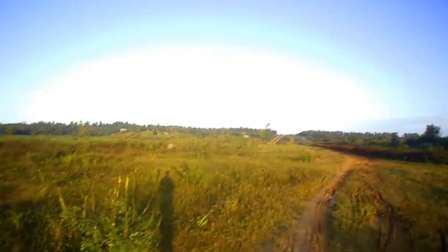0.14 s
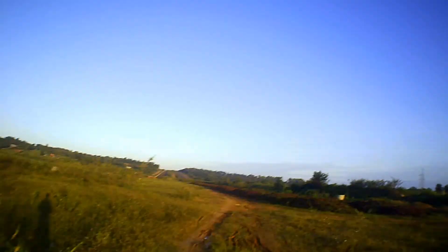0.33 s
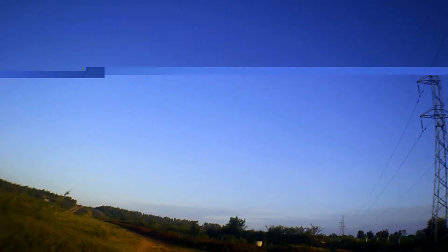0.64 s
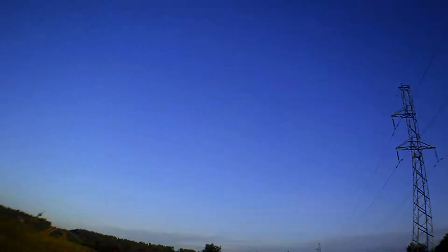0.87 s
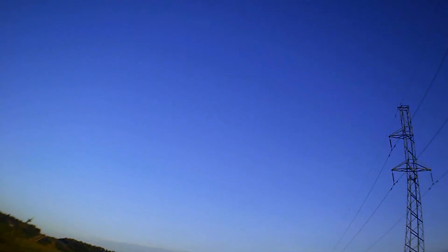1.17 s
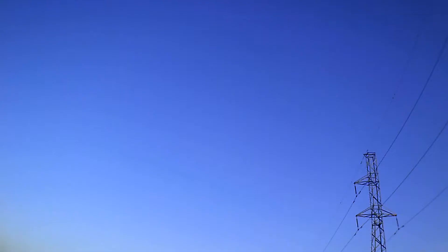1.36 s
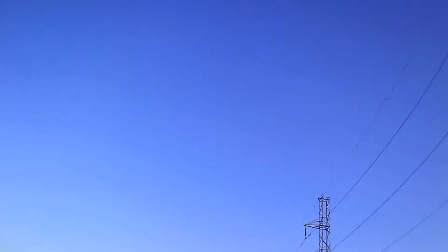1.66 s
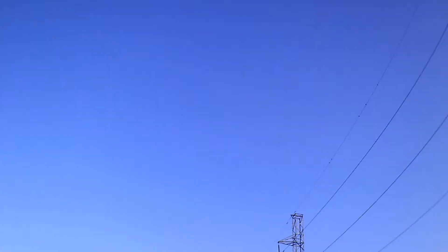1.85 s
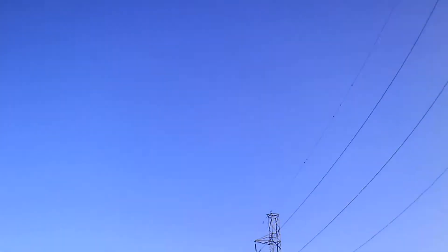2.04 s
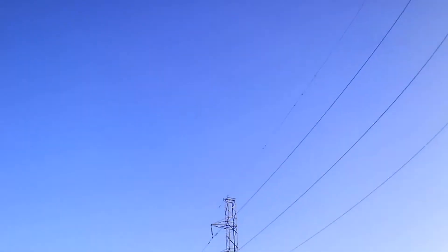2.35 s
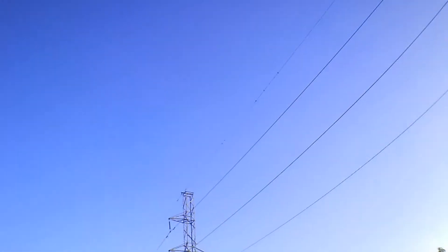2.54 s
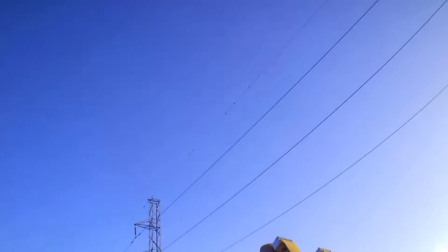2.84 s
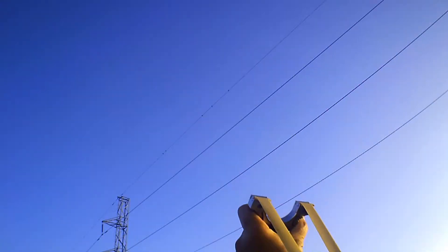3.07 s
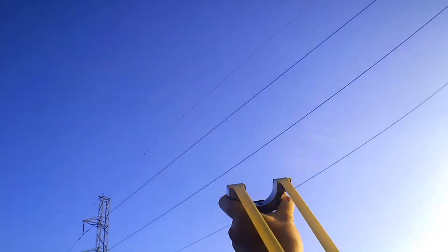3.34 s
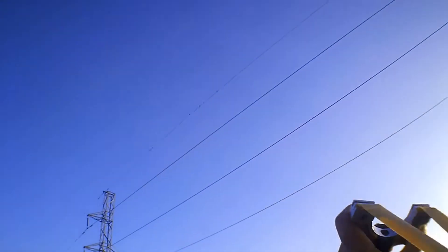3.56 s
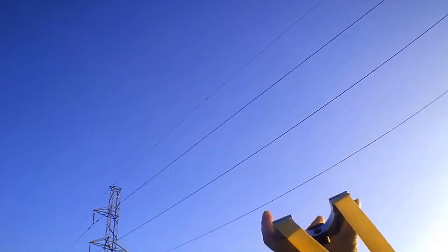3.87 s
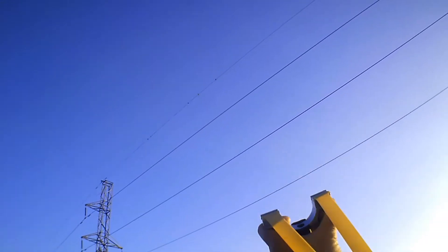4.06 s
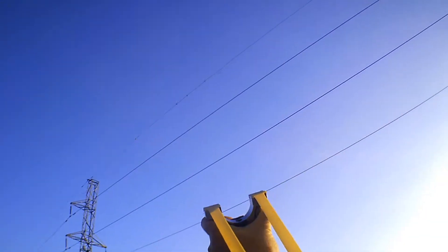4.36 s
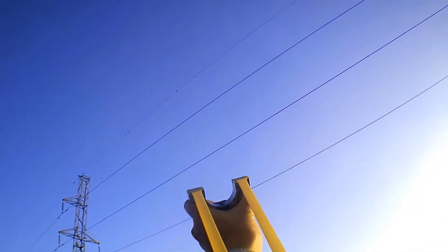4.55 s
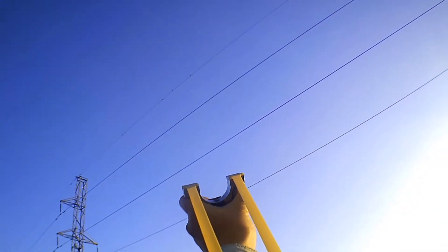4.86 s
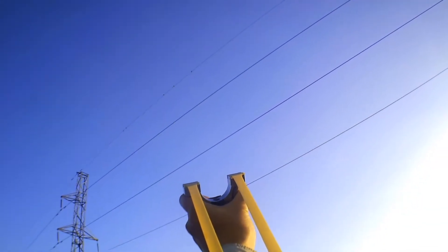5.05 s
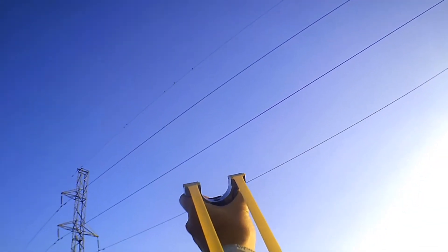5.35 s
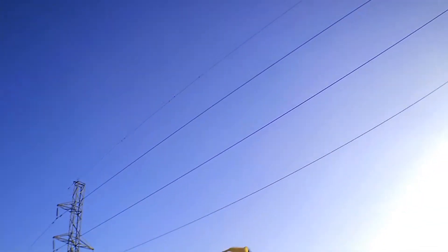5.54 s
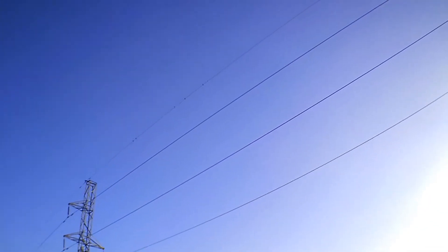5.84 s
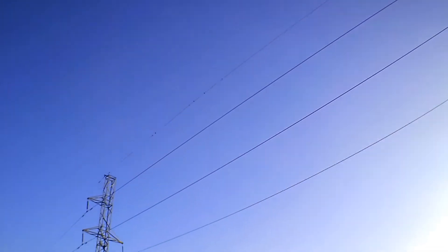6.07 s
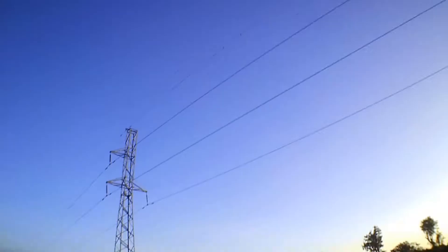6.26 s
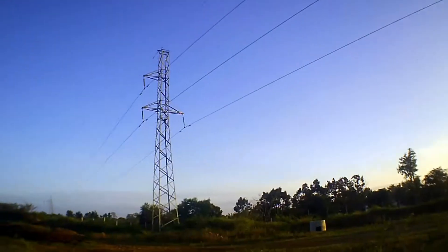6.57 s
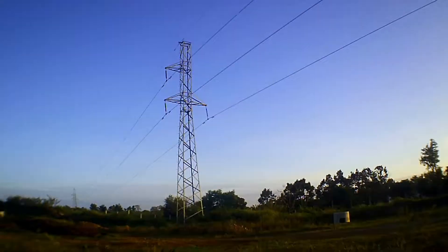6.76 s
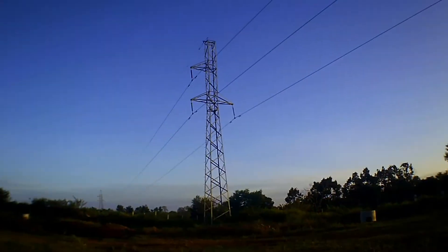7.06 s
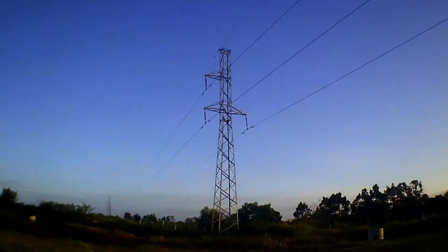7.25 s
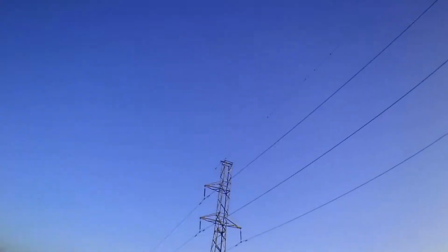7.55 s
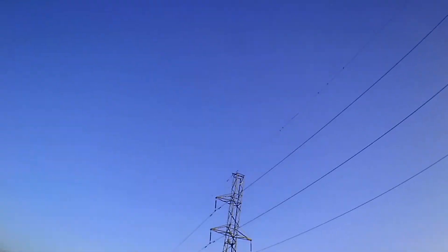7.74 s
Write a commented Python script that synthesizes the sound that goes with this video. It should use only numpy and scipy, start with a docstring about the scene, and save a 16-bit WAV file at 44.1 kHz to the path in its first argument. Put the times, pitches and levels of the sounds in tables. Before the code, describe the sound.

In a quiet open field, low wind buffets a small close microphone while far birds whistle and chirp faintly. Just after two seconds a slingshot fires with one loud, dry crack, a short thump of air and rapid rubber slaps, leaving a thin scattered echo. Later a hand rubs and creaks on the stretched rubber, with small knocking squeaks, as wind gusts and birds continue.

```python
"""A slingshot is shot once in an open field: damped modes for the shoved air and the recoiling hand, a swept
crack as the bands whip past the fork, then noise bursts for the flapping and struck modes for the slaps. Later
the hand rubs and creaks on the drawn slingshot, close to a small camera: random slips and short rings. Low-
passed noise buffets the microphone as wind; pitch-swept tones and resonant rasps are far birds and insects.
Grass rustles, a faint drone wavers, and bushes and banks throw the sounds back as scattered echoes."""
import sys
import numpy as np
from scipy import signal
from scipy.fft import rfft, irfft
from scipy.io import wavfile
from scipy.ndimage import uniform_filter1d

SR = 44100
rng = np.random.default_rng(int(sys.argv[2]) if len(sys.argv) > 2 else 0)


def wav_record(signal):
    """Record a signal, one row per channel, as 16-bit PCM in the file named by sys.argv[1]."""
    frames = np.transpose(np.atleast_2d(signal))
    bounded = np.clip(frames, -1, 1)
    # unit amplitude maps onto the largest positive 16-bit level
    quanta = np.round(bounded * 32767).astype(np.int16)
    wavfile.write(sys.argv[1], SR, quanta)


N = 348831
TIME = np.arange(N) / SR  # [s]
TOP_HZ = 15700  # upper band edge of the camera, and end of the crack's sweep

# air shoved by the bands, then the hand swaying as it recoils, as damped modes: (time [s], frequency [Hz], T60
# [s], level [dB])
SHOVE_MODES = [(2.3696, 152.5, 0.036, -18.5), (2.3736, 72.4, 0.031, -10.5), (2.4076, 22.57, .15, -22.5)]
# whip crack of the band tips, one row: (time [s], level [dB], length [s])
WHIP_CRACK = (2.3803, -18, 0.0022)


def undb(db):
    """Amplitude ratio from the logarithmic decibel scale."""
    return 10 ** (np.asarray(db) / 20)


def unit(x):
    """Normalise the mean power to 1."""
    return x / np.sqrt(np.mean(x ** 2))


def noise():
    """White noise: equal power at every frequency."""
    return rng.standard_normal(N)


def curve(rows):
    """Gain over time, interpolated linearly in level through (time [s], level [dB]) rows."""
    return undb(np.interp(TIME, *np.transpose(rows)))


def clock(length):
    """Sample times of a short sound [s]."""
    return np.arange(int(length * SR)) / SR


def add(out, start, sound):
    """Superpose a sound at its start time [s]."""
    i = max(int(start * SR), 0)
    out[i:i + len(sound)] += sound[:max(N - i, 0)]


def colour(x, points, size=16384):
    """Minimum-phase filter of unit energy, shaped by (frequency [Hz], relative level [dB]) points."""
    hz, db = np.transpose(points)
    bin_hz = np.arange(size // 2 + 1) * SR / size
    log_gain = np.log(undb(np.interp(np.log(bin_hz + 1), np.log(hz), db)))
    # folding the cepstrum onto positive times makes the response causal
    cepstrum = irfft(log_gain)[:size // 2]
    cepstrum[1:] *= 2
    response = irfft(np.exp(rfft(cepstrum, size)))
    return signal.fftconvolve(x, response / np.linalg.norm(response))[:N]


def walk(rate):
    """Random modulation of rms 1: random steps at this rate [Hz], smoothed by a moving average."""
    k = int(SR / rate)
    steps = np.repeat(rng.standard_normal(N // k + 1), k)
    return unit(uniform_filter1d(steps, k)[:N])


def ring(hz, t60):
    """Damped oscillation of one struck mode, falling 60 dB in t60 [s]."""
    t = clock(.5)
    return np.sin(2 * np.pi * hz * t) * np.exp(-np.log(1000) * t / t60)


def tone(hz):
    """Sine of rms 1 whose phase integrates a pitch track [Hz]."""
    return np.sqrt(2) * np.sin(2 * np.pi * np.cumsum(hz) / SR)


def swell(t, edge=0.19):
    """Amplitude envelope with cosine flanks that take this share of the note."""
    return signal.windows.tukey(len(t), edge)


def swells(rows, rise_s, fall_s):
    """Power sum of (start [s], length [s], level [dB]) events with Gaussian rise and exponential decay."""
    power = np.zeros(N)
    for start, length, db in rows:
        early = (start - TIME).clip(0)
        late = (TIME - start - length).clip(0)
        fade = (early / rise_s) ** 2 / 2 + late / fall_s
        power += (undb(db) * np.exp(-fade.clip(0, 20))) ** 2
    return np.sqrt(power)


def narrow(x, hz, width_hz):
    """Resonance of a second-order system, normalised to rms 1."""
    return unit(signal.lfilter(*signal.iirpeak(hz, hz / width_hz, SR), x))


def wind(rumble_db=2.0, eddy_db=2.0):
    """Turbulent pressure: breeze, gusts and the shot's draught rumble on the microphone, above a quiet hiss."""
    # breeze between gusts, before eddies and rumble gain: (time [s], level [dB])
    breeze_levels = [(0, -55.5), (.55, -54), (.85, -45), (1.75, -45.5), (2.15, -50), (2.9, -52),
                     (4.2, -48.5), (5.4, -50.5), (6.4, -45), (7.2, -46), (7.9, -49)]
    # gusts, before the rumble gain: (start [s], length [s], level [dB])
    gust_rows = [(.87, 0.24, -43.5), (3.05, 0.09, -44.5), (3.63, .12, -36), (3.76, 0.24, -32.5),
                 (4.06, .1, -43.5), (5.985, 0.027, -38.5), (6.44, .07, -35.5), (6.8, 0.041, -38.5),
                 (6.97, 0.076, -41.5)]
    # spectrum of the wind rumble: (frequency [Hz], relative level [dB])
    wind_spectrum = [(6, -3.5), (14, 4.5), (24, 4), (40, -6.5), (80, -21.5), (160, -38.5), (300, -58),
                     (900, -90.5)]
    # spectrum of still field air and microphone hiss: (frequency [Hz], relative level [dB])
    air_spectrum = [(170, 0.5), (270, -10.5), (750, -18), (1600, -21.5), (2400, -25), (5100, -24.5),
                    (5550, -20.5), (5900, -22.5), (6250, -21.5), (6700, -23), (7100, -20.5), (7600, -27.5),
                    (14000, -29.5), (16000, -35)]
    breeze = curve(breeze_levels) * undb(eddy_db * walk(11))
    gusts = swells(gust_rows, rise_s=0.026, fall_s=0.043)
    # the draught starts with the first shove and is strongest at the crack
    draught_db, draught_width_s = -30, .025
    draught = undb(draught_db) * np.exp(-((TIME - WHIP_CRACK[0]) / draught_width_s) ** 2)
    flow = np.hypot(breeze, gusts) + draught * (TIME > SHOVE_MODES[0][0])
    rumble = unit(colour(noise(), wind_spectrum)) * flow * undb(rumble_db)
    hiss_level_db = -66.5 + 0.2602 * walk(3)
    hiss = undb(hiss_level_db) * colour(noise(), air_spectrum)
    return rumble + hiss


def drone():
    """Narrow-band noise: a twice-filtered resonance gives a thin, wavering drone from far away."""
    # far drone, one row: (centre [Hz], width of each resonance [Hz], level [dB])
    drone_band = (695, 50, -83)
    hz, width_hz, db = drone_band
    return undb(db) * narrow(narrow(noise(), hz, width_hz), hz, width_hz)


def insects(stroke_hz=138):
    """Amplitude-modulated resonance: wing strokes excite a narrow band in short rasps."""
    # insect rasps: (start [s], end [s], centre [Hz], width of each resonance [Hz], level [dB])
    rasp_rows = [(1.42, 1.668, 6920, 250, -80), (1.92, 2.166, 6860, 246, -80),
                 (5.17, 5.272, 6920, 352.8, -83), (5.279, 5.57, 6050, 250.7, -87),
                 (5.66, 5.88, 6900, 249.3, -80), (6.079, 6.326, 6910, 250.5, -80.5),
                 (6.415, 6.654, 6430, 700, -81), (6.925, 7.138, 6400, 803, -81),
                 (7.421, 7.596, 6380, 702, -79.5)]
    out = np.zeros(N)
    for start, end, hz, width_hz, db in rasp_rows:
        t = clock(end - start)
        strokes = np.sin(np.pi * stroke_hz * t) ** 2
        wing = narrow(narrow(rng.standard_normal(len(t)), hz, width_hz), hz, width_hz)
        add(out, start, undb(db) * swell(t, edge=.3) * unit(wing * strokes))
    return out


def whistle(length, top_hz, scoop_hz):
    """Frequency glide: one arched whistle scoops up, sags and drops away."""
    t = clock(length)
    scoop = scoop_hz * np.exp(-(t / 0.01815) ** 2)
    sag = 450 * t ** 2 / length  # [Hz], 450 Hz per second of length at the end
    drop = 110 * np.exp((t - length) / .012)  # [Hz]
    return swell(t, edge=0.21) * tone(top_hz - scoop - sag - drop)


def far_birds():
    """Near-pure tones: one bird repeats a phrase of arched whistles; another coos lower."""
    # whistled phrases: (start [s], level [dB])
    phrase_rows = [(.705, -69), (4.772, -68), (7.655, -67)]
    # whistles of a phrase: (time from its start [s], length [s], pitch ceiling [Hz], scoop [Hz], level [dB])
    whistle_rows = [(.002, .14, 1156, 340, -1), (0.126, .058, 1130, 90, -3.5),
                    (0.193, .05, 1120, 300, -3.5), (0.286, .135, 1090, 220, -3)]
    # low coos: (start [s], length [s], reference pitch [Hz], level [dB])
    coo_rows = [(1.539, 0.055, 592, -74.5), (1.61, 0.084, 614, -71), (3.32, 0.076, 812, -76.5),
                (5.212, 0.0791, 614, -69), (7.409, 0.049, 570, -78)]
    out = np.zeros(N)
    for start, call_db in phrase_rows:
        for s, length, top_hz, scoop_hz, db in whistle_rows:
            add(out, start + s, undb(call_db + db) * whistle(length, top_hz, scoop_hz))
    for start, length, coo_hz, coo_db in coo_rows:
        t = clock(length)
        # each coo arches between 0.89 and 0.955 of its reference pitch
        arch = 0.89 + 0.065 * np.sin(np.pi * t / length)
        add(out, start, undb(coo_db) * swell(t) * tone(coo_hz * arch))
    return out * undb(1.0 * walk(50))  # the level flickers by 1 dB rms


def reeler(period=.0395, top_hz=3420, bottom_hz=3080):
    """Periodic pulse train: even runs of tiny falling chips."""
    # runs of a reeling bird: (start [s], end [s], mean chip level [dB])
    reel_rows = [(0.608, 1.25, -82.5), (1.432, 1.99, -81.5), (3.448, 4.03, -79), (4.053, 4.95, -83.5),
                 (5.298, 6.1, -85.5), (6.148, 6.8, -85.5), (7.309, 7.9, -79)]
    out, t = np.zeros(N), clock(.024)
    for start, end, db in reel_rows:
        for s in np.arange(start, end, period):
            pitch = np.linspace(top_hz, bottom_hz, len(t)) * (1 + 0.012 * rng.standard_normal())
            chip_db = db + 1.2 * rng.standard_normal()
            add(out, s, undb(chip_db) * swell(t, edge=0.98) * tone(pitch))
    return out


def warbler(trill_hz=105, trill_share=.7, trill_per_slur=.3, level_db=-1.0):
    """Frequency modulation: slurs begin with a fast trill and end clean; wider slurs trill deeper."""
    # warbler notes: (start [s], length [s], slur start [Hz], slur end [Hz], level before level_db [dB])
    note_rows = [(1.095, .1, 3900, 3260, -82.5), (1.326, .085, 4030, 3150, -76.5),
                 (1.583, 0.077, 4000, 3300, -78), (1.933, 0.079, 4000, 3250, -81),
                 (2.155, 0.084, 3970, 3150, -77), (2.575, .12, 3763, 3100, -77),
                 (2.789, .125, 3755, 3050, -77), (3.006, 0.0744, 3316, 2965, -75.5),
                 (3.059, .055, 3030, 3440, -79), (3.11, 0.029, 4050, 3350, -75.5),
                 (3.142, 0.084, 3300, 3028, -80), (3.286, .128, 3690, 3030, -76.5),
                 (3.518, 0.096, 3110, 3680, -75.5), (3.581, .07, 3016, 3270, -76.5),
                 (3.649, .04, 3827, 3050, -73), (4.546, .05, 3540, 3600, -79.5),
                 (6.156, 0.053, 4355, 3870, -83), (6.685, .04, 3480, 3595, -78),
                 (6.691, .038, 4300, 3900, -80)]
    out = np.zeros(N)
    for s, length, start_hz, end_hz, db in note_rows:
        t = clock(length)
        u = t / length
        slur = start_hz + (end_hz - start_hz) * u ** 2.1
        depth_hz = trill_per_slur * abs(end_hz - start_hz)
        fading = np.maximum(1 - (u / trill_share) ** 3, 0)
        trill = depth_hz * fading * np.sin(2 * np.pi * (trill_hz * t + rng.random()))
        add(out, s, undb(db + level_db) * swell(t, edge=0.24) * tone(slur + trill))
    return out


def rustle(flicker_db=2.0):
    """Friction noise: grass stirs faintly, and grass and sleeve brush as the body turns."""
    # brushes of grass and sleeve: (start [s], length [s], level [dB])
    brush_rows = [(.11, 0.19, -73.5), (1.08, 0.35, -78.5), (2.6, 0.25, -81), (3.15, 0.22, -76),
                  (3.65, 0.42, -77), (6.4, .1, -82)]
    # spectrum of the rustle: (frequency [Hz], relative level [dB])
    rustle_spectrum = [(200, -8.5), (480, -2), (760, -2), (1100, -3), (1550, -.5), (2100, -10.5),
                       (4000, -18.5), (8000, -31), (15000, -42.5)]
    grass_db = -90
    level = undb(grass_db) + swells(brush_rows, rise_s=.08, fall_s=.14)
    return colour(noise() * level * undb(flicker_db * walk(40)), rustle_spectrum)


def grip(grain_db=2.5, patchy_db=1.0, slips_per_s=4000):
    """Stick-slip friction: skin and rubber slip in tiny steps, harder with each stroke of the hand."""
    # the hand holds the drawn grip, one row: (start [s], length [s], level [dB])
    hold_row = (4.05, 1.9, -73)
    # strokes of the slipping hand: (start [s], length [s], level [dB])
    stroke_rows = [(4.077, 0.029, -67.5), (4.212, 0.031, -68), (4.374, .12, -68.5), (4.547, 0.074, -65),
                   (4.782, 0.055, -63.5), (4.94, 0.072, -65.5), (5.176, .035, -65), (5.324, 0.087, -62.5),
                   (5.518, 0.033, -59.5), (5.691, 0.0613, -67.5), (5.942, 0.032, -64.5)]
    # spectrum of the rubbing: (frequency [Hz], relative level [dB])
    rub_spectrum = [(200, -12.5), (480, -7), (760, 3), (1100, -3.5), (1550, -5), (2100, -19), (4000, -26.5),
                    (8000, -35), (15000, -38.5)]
    slips = (rng.random(N) < slips_per_s / SR) * noise() * undb(grain_db * walk(300))
    pressure = swells([hold_row] + stroke_rows, rise_s=0.013, fall_s=0.017)
    pressure = pressure * undb(patchy_db * walk(60))
    return colour(unit(slips) * pressure, rub_spectrum)


def creaks(overtone=1.564, overtone_db=-6):
    """Stick-slip transients: the larger slips of the grip tick and ring for a few cycles."""
    # larger creaks: (time [s], level [dB], pitch [Hz], tick level relative to the ring [dB])
    creak_rows = [(3.413, -45.5, 1756, -35), (4.039, -58, 900, -2), (4.055, -63, 1508, 4.5),
                  (4.167, -60, 1402, -3.5), (4.754, -51, 721, -28.5), (4.853, -47, 810, -27),
                  (5.0987, -43.5, 884, -36), (5.1589, -47.5, 935, -26), (5.2155, -49.5, 1350, -25.5),
                  (5.311, -48.5, 990, -28), (5.449, -48, 1193, -28), (5.518, -47.5, 1204, -27),
                  (5.537, -50, 985, -26), (5.577, -49.5, 745.4, -28), (5.616, -52, 890, -18),
                  (5.798, -40, 787, -34), (5.8487, -50.5, 885, -28.5), (6.109, -56, 1900, -11)]
    rings, ticks, t = np.zeros(N), np.zeros(N), clock(.012)
    for s, db, hz, tick_db in creak_rows:
        t60 = 13 / hz  # 13 cycles until a creak has died away
        partials = ring(hz, t60) + undb(overtone_db) * ring(overtone * hz, t60 / 2)
        add(rings, s, undb(db) * partials)
        burst = rng.standard_normal(len(t)) * np.exp(-t / 0.0027)
        add(ticks, s, undb(db + tick_db) * burst)
    # soft skin rounds the start of every creak
    skin = signal.butter(3, [450, 2100], "band", fs=SR, output="sos")
    rings = signal.sosfilt(skin, rings)
    return rings + colour(ticks, [(800, 5), (4000, 8), (9000, 2), (12000, -9)])


def field(x, wet_db, t60, damp_hz):
    """Diffuse scattering: ground and bushes return a thin, dull, decaying tail."""
    t = clock(t60)
    # cubed noise is sparse, like a few strong reflections among many weak ones
    scatter = rng.standard_normal(len(t)) ** 3 * np.exp(-np.log(1000) * t / t60)
    band = signal.butter(2, [400, damp_hz], "band", fs=SR, output="sos")
    reflected = signal.fftconvolve(x, scatter / np.linalg.norm(scatter))[:N]
    return undb(wet_db) * signal.sosfilt(band, reflected)


def banks(shot):
    """Discrete reflection: bushes and banks return separate smeared echoes of the shot."""
    # echoes: (delay [s], gain applied to the smeared shot [dB])
    echo_rows = [(.078, -29), (0.102, -39), (.183, -35.5), (.266, -40.5)]
    smeared = field(shot, wet_db=-2.5, t60=0.057, damp_hz=2500)
    out = np.zeros(N)
    for delay, db in echo_rows:
        add(out, delay, undb(db) * smeared)
    return out


def whip():
    """Swept impulse: the band tips speed up past the fork, a crack sweeping upward in about two milliseconds."""
    # spectrum of the crack: (frequency [Hz], relative level [dB])
    crack_spectrum = [(600, -11), (2200, -14.5), (2800, -7), (4100, -2.5), (4950, -15), (5600, 3),
                      (6600, 3.5), (7100, -8.5), (8400, -8), (9600, 8.5), (11400, -13.5), (12700, 5.5),
                      (14200, -8), (15800, -27.5)]
    s, db, length = WHIP_CRACK
    out, t = np.zeros(N), clock(length)
    sweep = tone(np.linspace(0, TOP_HZ, len(t)))
    add(out, s, undb(db) * swell(t, edge=.1) * sweep)
    return colour(out, crack_spectrum)


def slingshot(flutter_db=6.0):
    """Impulsive excitation: the bands push air, whip past the fork with a crack, then flap back against it."""
    # rubber rushing and flapping: (time [s], level [dB], rise [s], fall [s])
    flap_rows = [(2.3772, -36.5, 0.0033, 0.0048), (2.3806, -28.5, 0.0017, 0.0033),
                 (2.3943, -40, 0.0048, .006), (2.4037, -29.5, .0025, .004), (2.4074, -31.5, 0.0013, .0025),
                 (2.421, -46, .004, 0.00699)]
    # pouch and bands striking the fork: (time [s], thud level [dB], sharp tick level [dB])
    slap_rows = [(2.38, -16.5, -21.5), (2.3847, -19, -28), (2.4014, -35.5, -14.5), (2.4042, -32.5, -13),
                 (2.4064, -31.5, -8.5), (2.4158, -42.5, -28.5), (2.419, -36.5, -34), (2.4815, -61.5, -43.5)]
    # modes of pouch and fork: (frequency [Hz], T60 [s], level [dB])
    pouch_modes = [(548.76, 0.0214, -4.5), (761.2, 0.052, -7.5), (966, 0.01853, -5), (1388.4, 0.016, -11),
                   (1700, 0.014, -11)]
    # spectrum of the rubber: (frequency [Hz], relative level [dB])
    rubber_spectrum = [(120, -5), (330, -5), (800, -2), (1050, 1), (1650, 5), (2350, -11.5), (3200, -5.5),
                       (4800, -11.5), (5600, -4), (7800, -9), (9800, -8), (11100, -18), (12900, -7.5),
                       (15500, -25.5)]
    body, ticks, power = np.zeros(N), np.zeros(N), np.zeros(N)
    for k, (s, hz, t60, db) in enumerate(SHOVE_MODES):
        # the first swing sucks air away, the later ones push it
        sign = 1 if k else -1
        add(body, s, sign * undb(db) * ring(hz, t60))
    # neighbouring modes swing in opposite directions, so the thud has little bass
    thud = sum((-1) ** k * undb(db) * ring(hz, t60) for k, (hz, t60, db) in enumerate(pouch_modes))
    for s, thud_db, tick_db in slap_rows:
        add(body, s, undb(thud_db) * thud)
        add(ticks, s, undb([tick_db]))  # a one-sample impulse
    # each swing of the slack rubber swells and dies away
    for s, db, rise, fall in flap_rows:
        age = TIME - s
        fade = np.where(age < 0, (age / rise) ** 2 / 2, age / fall)
        power += (undb(db) * np.exp(-fade.clip(0, 20))) ** 2
    flapping = np.sqrt(power) * noise() * undb(flutter_db * walk(900))
    return body + colour(flapping + ticks, rubber_spectrum) + whip()


def scene():
    """Superposition of the near slingshot, the far wildlife and their echoes in one open field."""
    shot = slingshot()
    wildlife = warbler() + reeler() + far_birds() + insects()
    shot_tail = field(shot, wet_db=-26, t60=0.39, damp_hz=4500)
    wildlife_tail = field(wildlife, wet_db=-11.5, t60=0.3005, damp_hz=7000)
    echoes = banks(shot) + shot_tail + wildlife_tail
    hand = grip() + creaks()
    return (shot + hand + rustle() + wildlife + echoes + drone() + wind())[None]


def record(dry, offset=-0.01294):
    """Band limiting: the camera cuts the top steeply and adds a small steady offset."""
    low_pass = signal.ellip(10, .2, 80, TOP_HZ, fs=SR, output="sos")
    return signal.sosfilt(low_pass, dry) + offset


dry = scene()
out = record(dry)
wav_record(out)
```